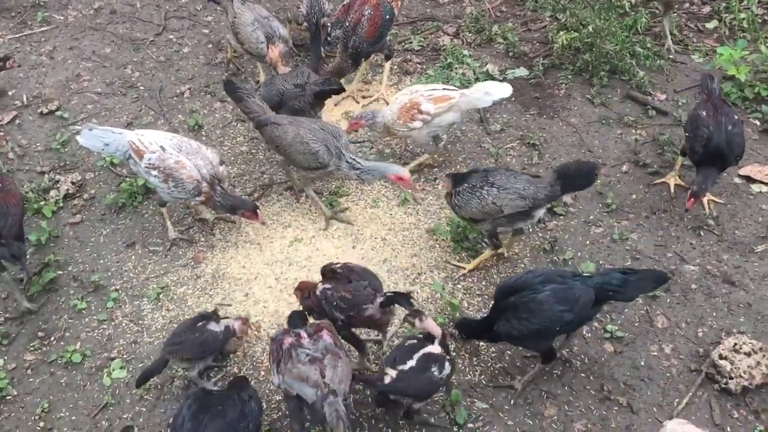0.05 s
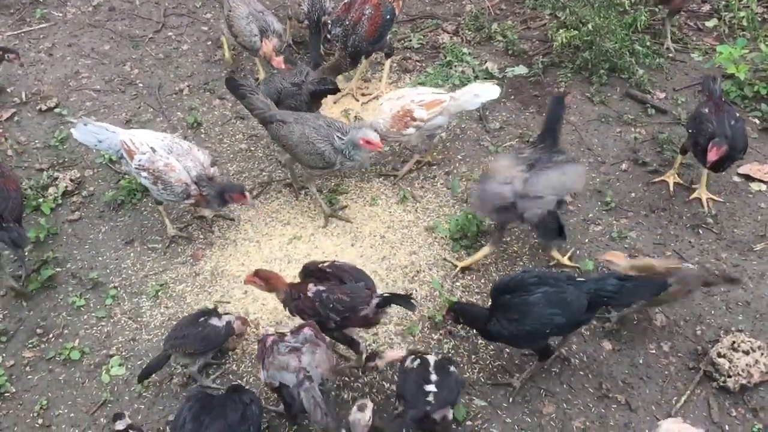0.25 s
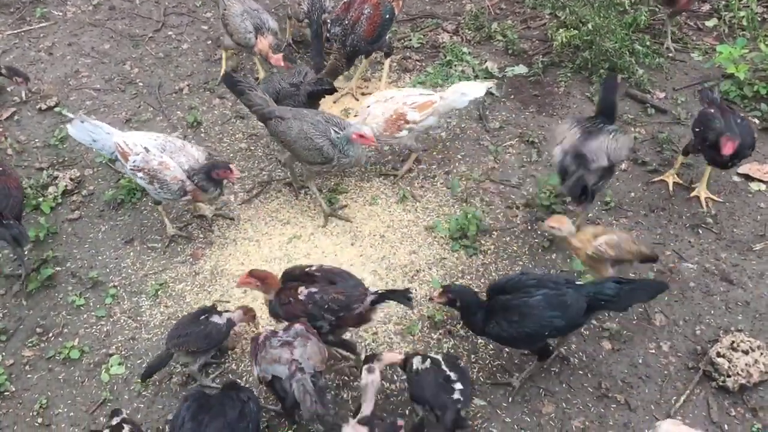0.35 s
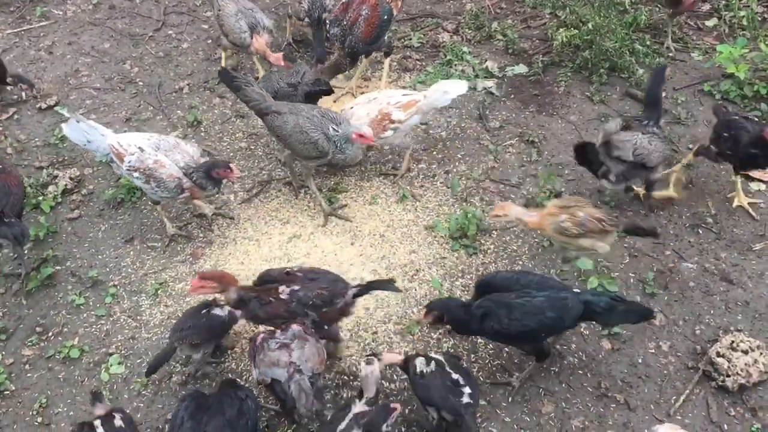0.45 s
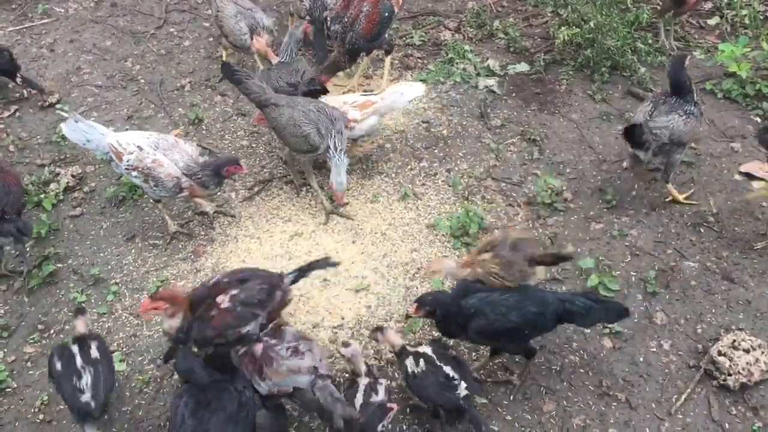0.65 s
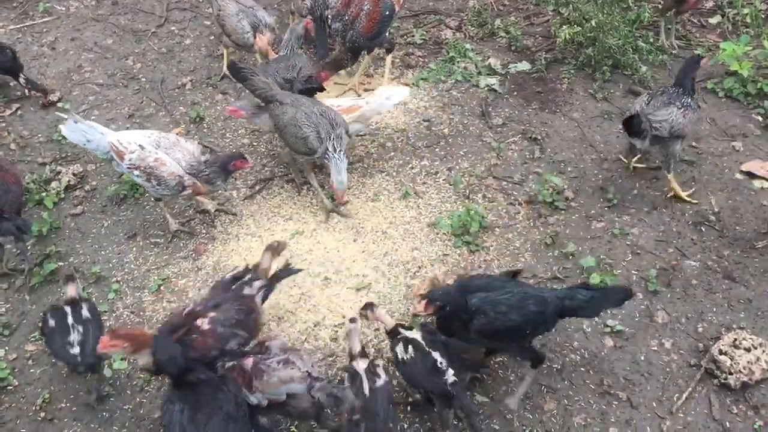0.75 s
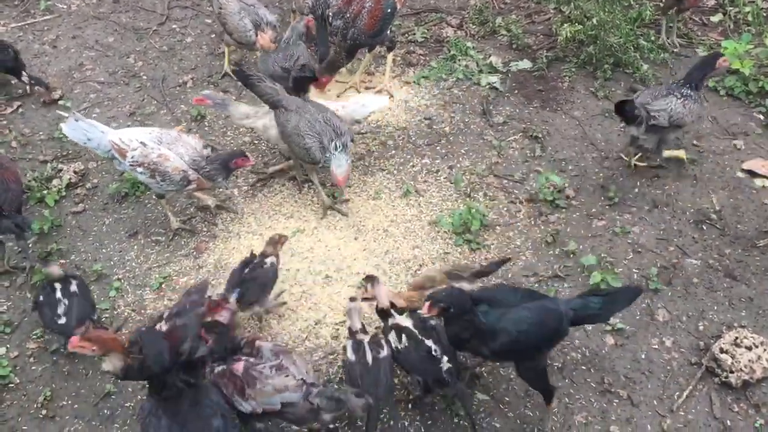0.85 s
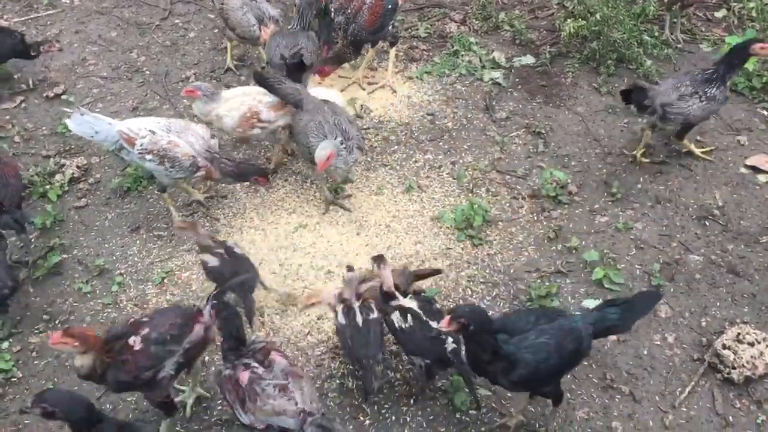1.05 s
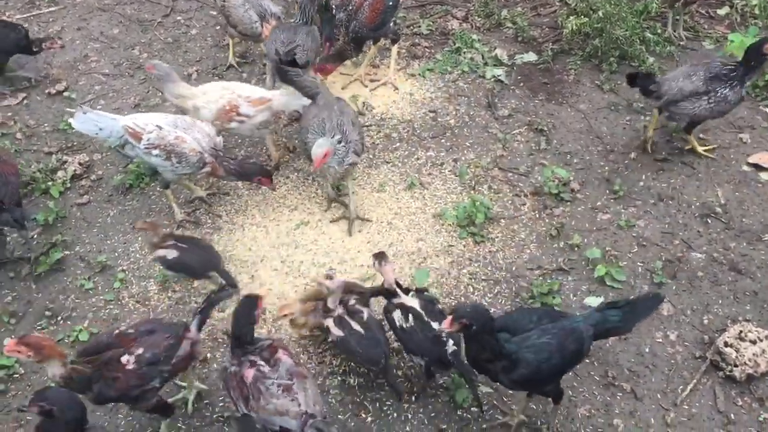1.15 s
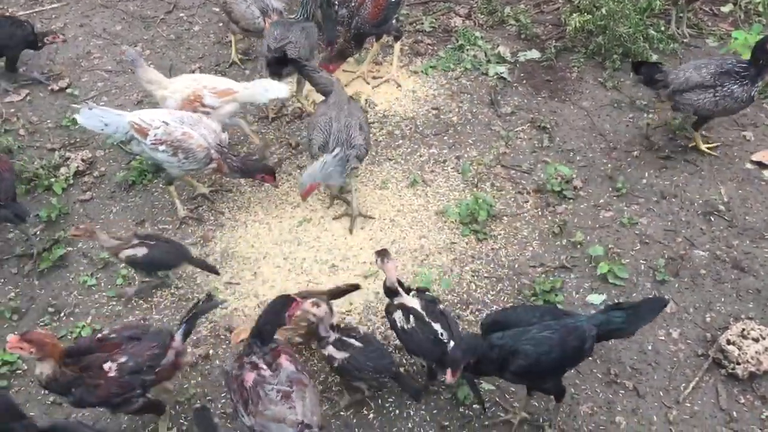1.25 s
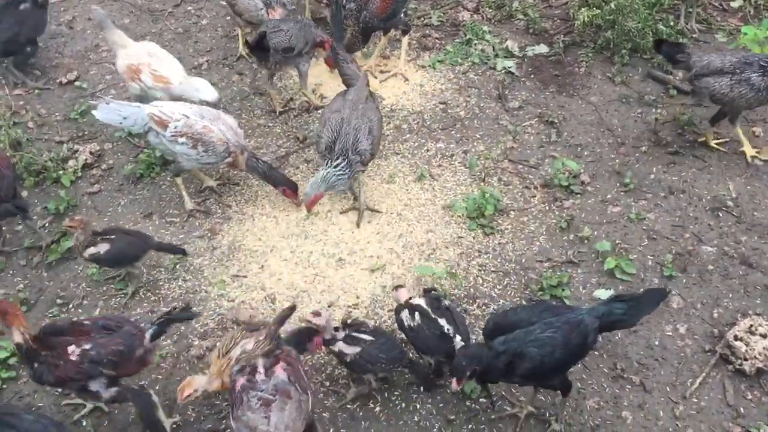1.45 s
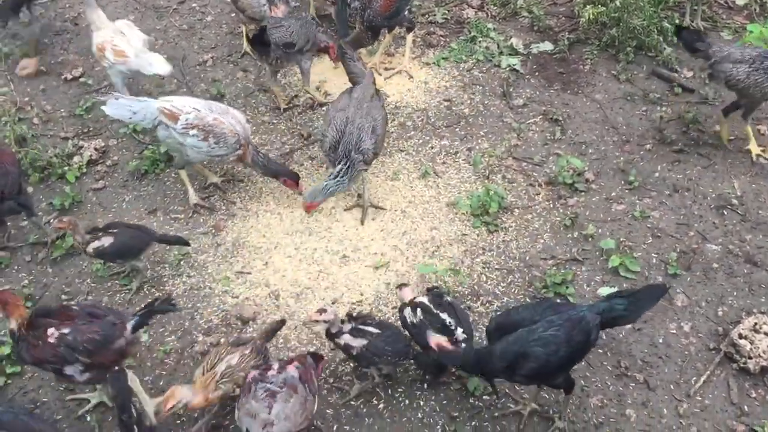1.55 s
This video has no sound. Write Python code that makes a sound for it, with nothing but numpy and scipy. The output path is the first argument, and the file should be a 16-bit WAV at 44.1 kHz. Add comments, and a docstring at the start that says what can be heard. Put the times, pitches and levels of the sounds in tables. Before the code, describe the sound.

A flock of chickens feeds close by in a quiet yard. Chicks peep throughout as one bird squawks loudly, then hens cluck softly, beaks click on grain, and a short sharp call comes at the end.

```python
"""Hens and chicks feeding in a yard

One bird squawks and hens cluck as pulses from the syrinx excite the resonances of the throat.
Chicks peep and older birds whine in nearly pure gliding tones; hoarse chatter is narrow-band noise.
Beaks click on grain, feet pat the earth and feathers rustle, with short reflections over quiet air."""
import sys
import numpy as np
from scipy import signal
from scipy.fft import rfft, irfft
from scipy.io import wavfile
from scipy.ndimage import uniform_filter1d, map_coordinates

SR = 44100
rng = np.random.default_rng(int(sys.argv[2]) if len(sys.argv) > 2 else 0)


def put_to_file(sound):
    """Save the sound as 16-bit audio at rate SR, in the file named by the first command-line argument."""
    columns = np.atleast_2d(sound).T  # one column per channel
    safe = np.clip(columns, -1, 1)
    whole_steps = np.round(safe * 32767)
    wavfile.write(sys.argv[1], SR, whole_steps.astype(np.int16))


N = 70560
T = np.arange(N) / SR
FREQS = np.maximum(np.arange(N + 1) * SR / (2 * N), 1)


def squawks(treble_hz=3060):
    """Source and filter: an open throat shapes a falling squawk, duller at low effort, and two barks."""
    # syrinx pulse rate: time_s, pitch_hz
    pitch = [(.198, 706.4), (.21, 908), (.217, 877), (.222, 689), (.238, 549.6), (.246, 636.7), (.255, 530),
             (.266, 512.7), (.272, 444.5), (.279, 383), (.285, 480), (.32, 409.4)]
    # vocal effort: time_s, level_db
    level = [(.197, -60), (.205, -45), (.218, -42.5), (.224, -31), (.231, -30), (.237, -34.5),
             (.246, -28.5), (.257, -35.5), (.284, -35), (.297, -48), (.306, -37), (.325, -75)]
    # break-up of the voice: time_s, roughness (0-1)
    roughness = [(.205, 0.38), (.224, 0.23), (.26, 0.2), (.285, 0.52)]
    # response of the wide open throat: frequency_hz, gain_db
    open_throat = [(200, -31), (600, -22.5), (850, -13), (1220, 0), (1600, -5.5), (2150, -18.5),
                   (3100, -16), (3500, -19), (4400, -20), (5000, -34), (6300, -26), (6900, -35),
                   (8500, -31), (15000, -41)]
    # thin resonances at the squawk's peak: start_s, length_s, start_hz, end_hz, level_db
    overtones = [(0.226, 0.016, 8190, 8900, -56.5), (0.229, 0.026, 11500, 10900, -63.5)]
    # sharp barks: start_s, length_s, start_hz, end_hz, level_db, roughness (0-1)
    barks = [(0.403, 0.0328, 524.6, 490.3, -42, .55), (1.593, .04, 725.5, 570, -36.5, 0.05)]
    throat = colour(open_throat)
    effort = undb(curve(level)) * (T > level[0][0]) * (T < level[-1][0])
    squawk = effort * voice(curve(pitch), curve(roughness), throat, fundamental_db=-8)
    treble = through(squawk, 1 / (1 + (treble_hz / FREQS) ** 4))
    squawk -= treble * (1 - np.sqrt(effort / effort.max()))
    return squawk + sum(hiss(*row) for row in overtones) + sum(call(*row, throat) for row in barks)


def voice(hz, roughness, throat, fundamental_db=0):
    """Syrinx pulses ring the throat; irregular vibration adds jitter, a subharmonic, rasp and shimmer."""
    jitter, jitter_hz, shimmer_db, rolloff_hz = .08, 416.1, 2.4, 5930
    phase = 2 * np.pi * np.cumsum(hz * (1 + jitter * roughness * walk(jitter_hz))) / SR
    fundamental = np.exp(1j * phase - hz / rolloff_hz)
    harmonics = fundamental ** 2 / (1 - fundamental)  # geometric series: harmonics 2 and up
    pulses = unit((undb(fundamental_db) * fundamental + harmonics).real)
    pulses *= 1 + .43 * roughness * np.cos(phase / 2)  # strong and weak pulses alternate
    rasp = .8 * roughness * rng.standard_normal(N) * (1 + np.cos(phase))
    sound = through((pulses + rasp) * undb(shimmer_db * roughness * walk(jitter_hz)), throat)
    return sound / np.sqrt(uniform_filter1d(sound ** 2, size=600) + 1e-18)  # running rms of 1


def call(start, length, hz0, hz1, db, roughness, throat):
    """A short voiced call: the pitch glides linearly under fixed formants."""
    u = progress(start, length)
    return undb(db) * swell(u) * voice(hz0 + (hz1 - hz0) * u, roughness, throat)


def hens():
    """Formants give each cluck a chest tone, a gap and a broad throat peak; whines are almost pure."""
    # clucks: start_s, length_s, start_hz, end_hz, level_db, roughness (0-1), formant_ratio
    clucks = [(0.379, 0.036, 320, 335, -49.5, 0.53, 1.04), (0.404, 0.043, 330.8, 269.7, -45, 0.83, 0.9),
              (0.77, 0.053, 629, 488.6, -49, 0.58, 1.5), (0.791, 0.039, 536, 421, -47, 0.49, 0.88),
              (0.836, 0.027, 455, 487, -48.5, 0.44, 1.18), (1.034, 0.07, 320.8, 294.5, -50.5, 0.75, 1.026),
              (1.18, 0.051, 310, 272.5, -48, 0.85, 0.984), (1.201, 0.071, 242, 222.6, -53.5, 0.57, 0.954),
              (1.361, 0.045, 460, 437.3, -45, 0.11, 1.174), (1.41, 0.069, 427, 393.7, -60.5, 0.66, 0.98)]
    # response of the nearly closed throat: frequency_hz, gain_db
    throat = [(100, -44), (230, -4.5), (320, -9.5), (480, -14), (620, -28), (830, 2), (1160, -1.5),
              (1560, -17), (2050, -17.5), (2500, -23), (4200, -37.5), (12000, -47)]
    # soft whines: start_s, length_s, start_hz, middle_hz, end_hz, level_db
    whines = [(0.124, 0.036, 1150, 1086, 1034, -59.5), (0.578, 0.067, 1002, 843, 856, -60),
              (0.685, 0.063, 1325, 1306, 1003, -56.5), (0.737, 0.036, 1232, 1054, 840, -52.5),
              (0.868, 0.069, 1215, 1425, 1090, -58.5), (1.475, 0.033, 1900, 1760, 1510, -58)]
    clucking = sum(call(*row, colour([(hz * ratio, db) for hz, db in throat])) for *row, ratio in clucks)
    return clucking + sum(whistle(*row, octave_db=-13.5) for row in whines)


def chicks(far_count=18, far_s=.06, far_db=-68):
    """Frequency glides, mostly falling, make the peeps; fainter ones come at random from further off."""
    # near peeps: start_s, length_s, start_hz, middle_hz, end_hz, level_db
    peeps = [(.000, 0.051, 4030, 3817, 3325, -54), (0.049, 0.033, 3550, 3120, 2730, -51.5),
             (0.186, 0.027, 4310, 3654, 3160, -53.5), (0.321, 0.023, 3524, 3570, 3310, -52),
             (0.336, 0.033, 3270, 2930, 2830, -49.5), (.356, 0.022, 4150, 3880, 3550, -55),
             (.381, 0.038, 3450, 3124, 3140, -54.5), (0.449, 0.057, 2534, 2128, 2027, -58),
             (.473, 0.019, 3980, 4720, 4180, -58), (0.486, 0.037, 3900, 3630, 3570, -57.5),
             (0.491, 0.013, 2560, 2620, 3130, -51), (.516, 0.03, 3355, 2672, 2760, -50),
             (0.544, 0.042, 4400, 4000, 3640, -57.5), (0.593, 0.024, 3370, 3040, 3330, -51),
             (0.686, 0.019, 3150, 2670, 2240, -61.5), (0.714, 0.099, 4500, 4100, 3320, -67),
             (0.726, 0.066, 5560, 4740, 4070, -70.5), (0.745, 0.031, 3250, 2840, 2650, -59),
             (0.774, 0.024, 3250, 2840, 2800, -55), (0.783, 0.061, 3404, 3108, 2810, -48.5),
             (0.817, 0.019, 2660, 2066, 1860, -55.5), (0.83, 0.053, 3800, 3570, 2650, -55),
             (0.905, 0.027, 3234, 3050, 2550, -51), (0.948, .02, 3600, 3120, 2610, -45.5),
             (1.108, 0.036, 3920, 3230, 2780, -53), (1.14, 0.03, 3550, 3605, 3530, -57),
             (1.236, 0.0087, 3390, 3070, 2910, -47), (1.248, 0.019, 2850, 2550, 2500, -68),
             (1.261, 0.046, 3940, 3020, 2730, -61), (1.282, 0.044, 3724, 3260, 2740, -60.5),
             (1.388, 0.032, 4300, 3850, 3340, -55), (1.418, 0.027, 3340, 3090, 2710, -52.5),
             (1.453, 0.037, 3850, 3440, 2960, -61), (1.458, 0.014, 2430, 2250, 2330, -55.5),
             (1.481, 0.022, 3035, 2560, 2250, -52), (1.526, 0.052, 4550, 3660, 3163, -54),
             (1.571, 0.023, 3300, 3006, 2940, -49)]
    # hoarse chatter: start_s, length_s, start_hz, end_hz, level_db
    chatter = [(1.143, 0.054, 3600, 4650, -62.5), (1.291, 0.0484, 3970, 4340, -63.5),
               (1.413, 0.091, 3845, 3485, -60.5)]
    sound = sum(whistle(*row) for row in peeps) + sum(hiss(*row) for row in chatter)
    for slot, (delay, pitch) in enumerate(rng.random((far_count, 2))):
        glide_hz = np.array([3900, 3030, 2803]) * 2 ** ((pitch - .5) / 2)  # within a quarter octave
        sound += whistle((slot + delay) * T[-1] / far_count, far_s, *glide_hz, far_db)
    return sound


def whistle(start, length, hz0, hz1, hz2, db, octave_db=-30.5):
    """A tone on a parabolic glide; random modulation adds sidebands, heard as slight hoarseness."""
    wobble, flutter_db, rasp_db = .014, 2.3, -16
    u = progress(start, length)
    glide_hz = np.polyval(np.polyfit([0, .5, 1], [hz0, hz1, hz2], 2), u)
    phase = 2 * np.pi * np.cumsum(glide_hz * (1 + wobble * walk(hz=400))) / SR
    level = undb(db + flutter_db * walk(hz=220)) * swell(u, attack=.23, release=.13)
    rasp = undb(rasp_db) * walk(hz=1080) * np.cos(phase)
    return np.sqrt(2) * level * (np.sin(phase) + rasp + undb(octave_db) * np.sin(2 * phase))


def hiss(start, length, hz0, hz1, db, width_hz=980):
    """Narrow-band noise: breath in one gliding resonance sounds hoarse and half-pitched."""
    u = progress(start, length)
    phase = 2 * np.pi * np.cumsum(hz0 + (hz1 - hz0) * u) / SR
    return undb(db) * swell(u) * (walk(width_hz) * np.sin(phase) + walk(width_hz) * np.cos(phase))


def pecks(scatter_db=-21.5, scatter_s=.0048):
    """Impact excitation: an impulse and a thin, decaying scatter ring the modes of beak and grain."""
    # beak strikes: start_s, peak_db
    strikes = [(.9638, -34.5), (.9652, -42.5), (0.983, -38.5), (0.9901, -35), (.9915, -26.5), (1.0005, -47),
               (1.2193, -44)]
    # modes of beak and grain: frequency_hz, width_hz, gain_db
    modes = [(910, 460, 0), (2050, 600, 8.5), (3680, 1150, 8), (6370, 500, -2.5), (8130, 640, -7),
             (11800, 3900, -14.5)]
    ring = sum(undb(db) * band(hz, width_hz) for hz, width_hz, db in modes)
    force = np.zeros(N)
    for start, db in strikes:
        force[int(start * SR)] += undb(db)
        decay = (T > start) * np.exp(-abs(T - start) / scatter_s)
        force += undb(db + scatter_db) * decay * rng.standard_normal(N)
    return through(force, ring / abs(irfft(ring)).max())


def feet(rise_s=.0022):
    """Heavy damping: each dull pat on the earth dies within a few cycles."""
    # footfalls: start_s, pitch_hz, level_db
    steps = [(0.596, 182, -53.5), (0.892, 336, -48.5), (1.004, 346, -53.5)]
    pats = np.zeros(N)
    for start, hz, db in steps:
        age = np.maximum(T - start, 0)
        pats += undb(db) * age / rise_s * np.exp(1 - age / rise_s) * np.sin(2 * np.pi * hz * age)
    return pats


def rustle(level_db=-56.5, grain_db=4):
    """Friction noise: claws and feathers scratch briefly as birds jostle over the feed."""
    grains = rng.standard_normal(N) * undb(grain_db * walk(hz=400))
    envelope = np.sin(np.pi * progress(start=1.165, length=.077))
    return undb(level_db) * envelope * unit(through(grains, band(hz=3840, width_hz=1720)))


def yard(x, wet_db, t60_s=.13, delay_s=.0023):
    """Reflections from the ground and surroundings add a weak, exponentially decaying tail."""
    tail = rng.standard_normal(N) * np.exp(-np.log(1000) * T / t60_s) * (T > delay_s)
    return x + undb(wet_db) * signal.fftconvolve(x, tail / np.linalg.norm(tail))[:N]


def air(level_db=-66):
    """Steady broadband noise, strongest in the bass, is the quiet outdoor background."""
    # spectrum of the open air: frequency_hz, relative_density_db
    spectrum = [(22, -13.5), (55, -1), (91, 3), (200, -4), (800, -8), (1600, -6), (2400, -11), (3500, -7),
                (5000, -15.5), (9000, -21.5), (15500, -26.5)]
    return unit(through(rng.standard_normal(N), colour(spectrum))) * undb(level_db)


def undb(db):
    """Decibels to gain."""
    return 10 ** (np.asarray(db) / 20)


def unit(x):
    """Scale to rms 1."""
    return x / np.sqrt(np.mean(x ** 2))


def curve(rows):
    """Linear interpolation of (time_s, value) rows."""
    return np.interp(T, *np.array(rows).T)


def walk(hz):
    """Smooth noise of rms 1 that changes hz times a second."""
    return unit(map_coordinates(rng.standard_normal(4096), [T * hz], order=2, mode="wrap"))


def progress(start, length):
    """Elapsed share of an event, 0 to 1."""
    return np.clip((T - start) / length, 0, 1)


def swell(u, attack=.27, release=.37):
    """Raised-cosine envelope over progress u; attack and release are shares of the length."""
    rise = np.sin(np.pi / 2 * np.clip(u / attack, 0, 1)) ** 2
    fall = np.sin(np.pi / 2 * np.clip((1 - u) / release, 0, 1)) ** 2
    return rise * fall


def band(hz, width_hz):
    """Response of two equal resonators in series, gain 1 at the centre."""
    return 1 / (1 + 1j * (FREQS ** 2 - hz ** 2) / (FREQS * width_hz)) ** 2


def colour(points):
    """Minimum-phase response through (frequency_hz, gain_db) points."""
    hz, db = np.array(points).T
    cepstrum = irfft(np.log(undb(np.interp(np.log(FREQS), np.log(hz), db))))
    return np.exp(rfft(2 * cepstrum[:N], 2 * N) - cepstrum[0])


def through(x, response):
    """Filter by multiplying spectra."""
    return irfft(rfft(x, 2 * N) * response)[:N]


def scene():
    """Direct and reflected sound add; squawks and pecks arrive more directly than the rest."""
    background = air()
    near = yard(squawks() + pecks(), wet_db=-12)
    flock = yard(hens() + feet() + rustle() + chicks(), wet_db=-9.5)
    return (background + near + flock)[None]


def record(dry, top_hz=15750):
    """Band limiting: a steep low-pass filter removes the highest treble."""
    return signal.sosfilt(signal.ellip(10, .2, 70, top_hz, fs=SR, output="sos"), dry)


dry = scene()
out = record(dry)
put_to_file(out)
```